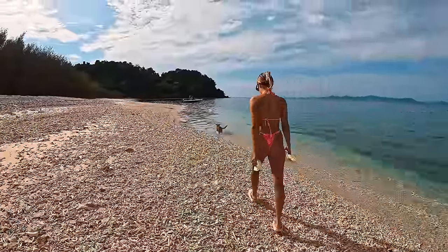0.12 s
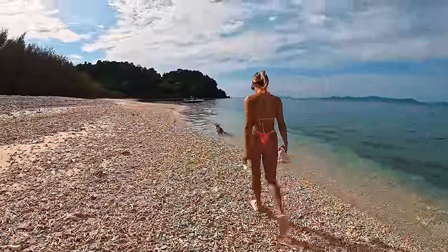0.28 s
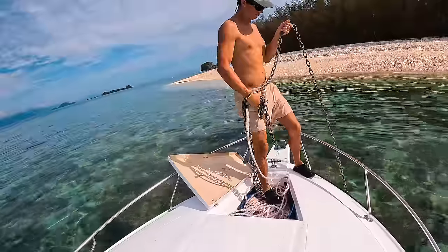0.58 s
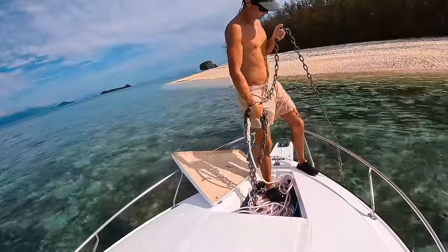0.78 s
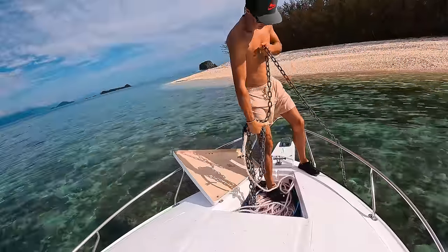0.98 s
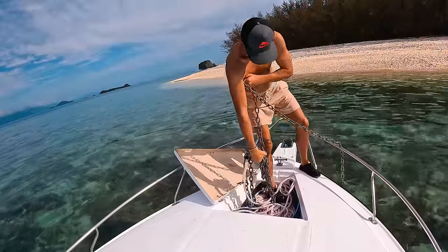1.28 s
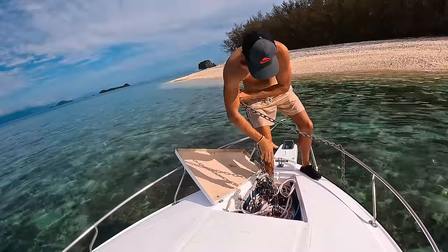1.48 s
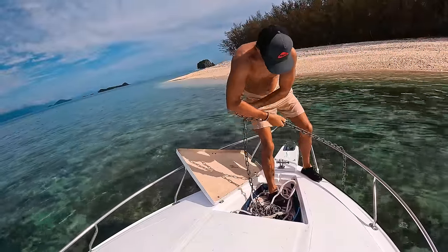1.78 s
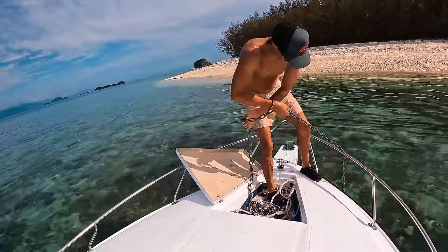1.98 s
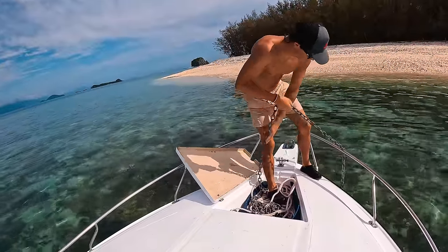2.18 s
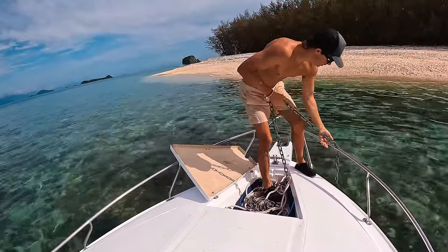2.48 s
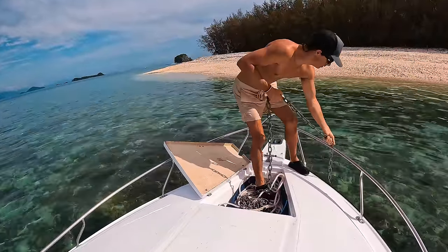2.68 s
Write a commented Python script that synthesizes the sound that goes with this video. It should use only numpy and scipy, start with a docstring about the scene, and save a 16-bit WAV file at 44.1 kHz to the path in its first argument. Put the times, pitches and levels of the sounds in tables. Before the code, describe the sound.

After soft crunching steps on a pebble beach and a tiny gap, chain links jingle close to the microphone, build to a dense bright pour, thump the hollow hull and thin out, over faint water and low wind rumble.

```python
"""Quiet steps crunch on beach gravel under wind; after a short silence a steel chain is hauled over a boat's bow.
Its links clink with a very high ring, a handful pours into the anchor well, and single links clink again.
Links are sums of decaying modes set off by timed or random contacts; deck and hull are modes struck by blows.
Gravel is bursts of tiny clicks; wind, water and the wind on the microphone are filtered noise."""
import sys
import numpy as np
from scipy import signal
from scipy.fft import rfft, irfft, next_fast_len
from scipy.io import wavfile
from scipy.ndimage import uniform_filter1d

SR = 44100
rng = np.random.default_rng(int(sys.argv[2]) if len(sys.argv) > 2 else 0)


def persist_wave(psi):
    """Save psi, clipped to +-1, as 16-bit WAV."""
    counts = np.round(np.clip(psi, -1, 1) * 32767).astype(np.int16)
    wavfile.write(sys.argv[1], SR, np.atleast_2d(counts).T)


N = 125685

# Single link contacts. Each row: start in seconds, relative level in dB, contact tick against the ring in dB.
CLINKS = [(0.6384, -40.5, 0.5), (0.715, -35.5, -2), (0.921, -25.5, -12), (0.9668, -23, -13),
          (0.9978, -16.5, -17), (1.065, -22.5, -15.5), (1.118, -23.5, -11), (1.1364, -15, -15),
          (1.143, -13, -24), (1.1653, -16.5, -15), (1.1968, -23, -9), (1.2755, -12, -17), (1.315, -24, -18),
          (1.389, -15.5, -19), (1.4345, -13.5, -14), (1.46, -10, -19), (1.4814, -3, -21),
          (1.515, -6.5, -20), (1.546, -7, -17), (1.605, -7.5, -13.5), (1.625, -19, -4),
          (1.7434, -22.5, -16.5), (1.8492, -44.5, 12), (1.9584, -18, -33), (2.0761, -22.5, -16),
          (2.1955, -35, -10), (2.233, -27, -34), (2.2773, -22.5, -20), (2.3317, -19, -19),
          (2.371, -18.5, -17), (2.4243, -25, -19), (2.5037, -28.5, -14.5), (2.5638, -31, -13),
          (2.572, -27.5, -9.5), (2.6044, -28.5, -29), (2.7978, -40.5, -7)]
# Ring of a steel link. Each row: frequency in Hz, relative level in dB, free ring time t60 in seconds.
LINK_MODES = [(11430, -12, .09), (11595, -3, .15), (11700, 0, .22), (11805, -7, .11), (12050, -12, .07),
              (12185, -6, .1), (12250, -2, .16), (12380, -10, .07), (12530, -7, .15)]
# Colour of a contact tick. Each row: frequency in Hz, relative level in dB.
TICK_COLOUR = [(300, -34), (1800, -13.5), (3500, -1.5), (9000, 8.5), (11000, 13), (13000, 4), (16000, -21)]
# Jingle of chain swaying in the hands, in two passages. Each row: time in seconds, relative level in dB.
SWAY_LEVELS = [
    [(0.86, -43.5), (0.94, -40), (1.04, -38.5), (1.11, -26), (1.17, -19), (1.25, -27), (1.3, -26),
     (1.37, -43)],
    [(2.17, -56.5), (2.25, -28), (2.31, -73), (2.45, -42), (2.54, -53.5), (2.62, -42), (2.67, -72)],
]
# Jingle of chain running into the well, in two passages. Each row: time in seconds, relative level in dB.
POUR_LEVELS = [
    [(1.375, -27.5), (1.425, -21.5), (1.485, -12.5), (1.54, -11.5), (1.615, -8.5), (1.66, -15.5),
     (1.70, -30.5), (1.77, -32.5), (1.83, -74)],
    [(1.93, -31.5), (1.965, -25.5), (2.02, -34), (2.05, -25), (2.1, -38), (2.125, -74)],
]
# Chain knocking on the deck. Each row: start in seconds, relative level in dB, tilt of the ring in dB per octave.
KNOCKS = [(1.8516, -32.5, 4), (1.857, -33.5, 1), (1.9478, -14.5, 6.5), (1.967, -26.5, -4.5),
          (1.9775, -24, -5), (1.989, -34, -5), (2.037, -20, -1.5), (2.0935, -21.5, 1.5), (2.643, -45.5, -6),
          (2.716, -46.5, -14), (2.728, -42.5, -11)]
# Ring of the deck. Each row: frequency in Hz, relative level in dB, t60 in seconds.
DECK_MODES = [(860, -1, 0.015), (1280, -1, 0.041), (1514, 1.5, 0.037), (1716, 2.5, 0.028),
              (1924, -2, 0.013), (2542, 4, 0.015), (3407, 7, 0.013), (4180, -7, 0.024), (4580, -11, .014),
              (5730, -10, .012)]
# Colour of a knock's crack. Each row: frequency in Hz, relative level in dB.
CRACK_COLOUR = [(200, -14.5), (900, 4), (1100, -1), (1550, 6), (3500, -2.5), (7200, -15), (16000, -35)]
# Links rattling over the deck between knocks. Each row: time in seconds, level in dB.
DRAG_LEVEL = [(1.93, -53), (1.97, -41), (2.01, -43), (2.085, -58)]
# Loops of chain thumping the hull. Each row: start in seconds, level in dB, tilt of the ring in dB per octave.
THUMPS = [(1.599, -30.5, -10), (1.6285, -31, -2.5), (1.857, -34.5, -6), (1.9505, -26, 1), (2.021, -36.5, 3),
          (2.039, -30, -3), (2.0935, -34.5, 1), (2.727, -36, 0.5)]
# Ring of the hull. Each row: frequency in Hz, relative level in dB, t60 in seconds.
HULL_MODES = [(68, -20, .1), (131, -3.5, 0.2), (207, 0, 0.056), (294.3, -5, 0.11), (510, -5.5, .04)]
# Groan as the chain drags over the bow. Each row: time in seconds, pitch in Hz, level in dB.
GROAN = [(1.991, 410, -53), (2.012, 385, -38), (2.066, 306, -38.5), (2.09, 292, -69)]
# The hull's boom under the moving chain. Each row: time in seconds, level in dB.
BOOM_LEVEL = [(1.1, -50), (1.42, -54.5), (1.49, -43), (1.57, -45), (1.62, -31.5), (1.69, -56),
              (1.83, -41.5), (2.0, -38), (2.2, -55), (2.6, -55.5), (2.73, -43), (2.84, -50)]
# Colour of that boom. Each row: frequency in Hz, relative level in dB.
BOOM_COLOUR = [(40, -2), (62, 5), (90, 0.5), (132, 6.5), (250, -3), (500, -9), (2000, -35)]
# Crunches of gravel underfoot. Each row: centre in seconds, level in dB, spread of the swell in seconds.
STEPS = [(0.046, -47.5, 0.031), (0.12, -42.5, 0.012), (0.192, -42.5, 0.022), (0.278, -50, 0.07),
         (0.453, -52, 0.092)]
# Colour of the gravel. Each row: frequency in Hz, relative level in dB.
GRAVEL_COLOUR = [(300, 3), (900, 3.5), (2000, -3), (4000, -4.5), (8000, -1), (12000, -3), (16000, -9)]
# Single pebbles chinking. Each row: start in seconds, frequency in Hz, level in dB.
PEBBLES = [(0.055, 14900, -31), (0.249, 7040, -38.5), (0.308, 7100, -39)]
# Wind and lapping water at the beach. Each row: frequency in Hz, relative density in dB per Hz.
BEACH_AIR = [(35, -2.5), (80, -14), (438, -17), (1490, -17.5), (6230, -32.5), (8620, -32.5), (15000, -50)]
# Level of the wind and water at the beach. Each row: time in seconds, level in dB.
BEACH_LEVEL = [(0, -46), (.2, -46.5), (.36, -48), (.49, -51.5), (.512, -38)]
# Wind and lapping water round the boat. Each row: frequency in Hz, relative density in dB per Hz.
BOAT_AIR = [(60, -0.5), (140, 2.5), (300, -4.5), (800, -3), (1600, -5), (3500, -11.5), (7000, -18),
            (10000, -20), (15000, -49)]
# Level of the wind and water round the boat, with a short scuff at 0.65 s.
# Each row: time in seconds, level in dB.
BOAT_LEVEL = [(.6, -56), (.632, -54), (.648, -38.5), (.69, -47), (.9, -50), (1.3, -54.5), (1.8, -52),
              (2.35, -50.5), (2.85, -55)]
# The silence between beach and boat: start and end in seconds.
SILENCE_S = (.519, 0.6014)
# Wind on the microphone. Each row: frequency in Hz, relative level in dB.
BUFFET_COLOUR = [(4, 3.5), (18, -8), (32, -34), (120, -81.5)]
# Hiss of the water. Each row: frequency in Hz, relative level in dB.
WASH_COLOUR = [(500, -10), (2500, 6.5), (7000, -6), (15000, -14)]

# links: mean rebound delay, and its level against the first hit
REBOUND_S, REBOUND_DB = 0.0028, -5.5
TICK_S, TICK_DB = 0.0029, -0.5
CLINK_DB, CLINK_RISE_S = -2, 0.0013  # a ring builds up as the links press together
CLINK_RING, JINGLE_RING = 0.42, 0.88  # share of the free ring time
LINK_SPREAD, MODE_SCATTER_DB = .004, 6  # scale of the random detuning and of the random mode levels
SWAY_DB, SWAY_PER_S, SWAY_TICK_DB = -3.5, 220, -18
POUR_DB, POUR_PER_S, POUR_TICK_DB = -4, 800, -18
CONTACT_SCATTER_DB = -0.5
SCRAPE_DB = -25  # links sliding over each other, against their ring
# deck: the first sharp push and the longer tail are set against the crack
CONTACT_DB, CRACK_S = -1, 0.0033
DECK_DB, DECK_TAIL_S, DECK_TAIL_DB = -7.5, 0.012, -15.5
DRAG_PER_S = 900
# beach and water
GRAINS_PER_S, GRAIN_SCATTER_DB, PEBBLE_T60_S = 3000, 4, 0.053
WASH_DB, WASH_FADE_DB_PER_S = -50.5, 18
# microphone and recorder
BEACH_BUFFET_DB, BOAT_BUFFET_DB, FADE_IN_S = -25.5, -27, 0.092
# faint stereo width: a delayed copy of all but the links, opposite in left and right
SIDE_DB, SIDE_LAG_S = -33.5, .004
TOP_HZ = 15750
OFFSET, OFFSET_RISE_S, OFFSET_SETTLE_S = -0.29, 0.052, 1


def clinks():
    """One link hits the next and rebounds: two ticks, and a ring with its own mix of the modes."""
    hz, db, t60 = np.array(LINK_MODES).T[:, :, None]
    t = np.arange(SR // 4) / SR
    rise = 1 - np.exp(-t / CLINK_RISE_S)
    decay = undb(-60 * t / (t60 * CLINK_RING))
    out, ticks = np.zeros(N + SR), np.zeros(N + SR)
    for start, level_db, tick_db in CLINKS:
        rebound = start + REBOUND_S * (.5 + rng.random())
        contact_pair = (start, undb(level_db)), (rebound, undb(level_db + REBOUND_DB))
        for when, size in contact_pair:
            detune, mix, phase = rng.uniform(-1.23, 1, (3, len(hz), 1))
            weight = undb(db + MODE_SCATTER_DB * mix)
            link_hz = hz * (1 + LINK_SPREAD * detune)
            modes = weight * decay * np.sin(2 * np.pi * link_hz * t + np.pi * phase)
            i = int(when * SR)
            out[i:i + len(t)] += size * rise * modes.sum(0) / np.linalg.norm(weight)
            ticks[i] += size * undb(tick_db)
    tick_noise = colour(burst(ticks[:N], TICK_S), TICK_COLOUR)
    return undb(CLINK_DB) * out[:N] + undb(TICK_DB) * tick_noise


def jingle(levels, per_s, tick_db, count=6):
    """Several slightly different links jostle at random, each contact ringing and ticking, and scrape as noise."""
    force = sum(curve(rows) for rows in levels)
    rings, ticks, ring_power = 0, 0, 0
    for _ in range(count):
        hits = unit(contacts(per_s / count, CONTACT_SCATTER_DB)) * force
        ticks = ticks + hits
        for hz, db, free_t60 in LINK_MODES:
            t60 = free_t60 * JINGLE_RING
            link_hz = hz * (1 + LINK_SPREAD * rng.uniform(-1.1, 1))
            rings = rings + undb(db) * ring(hits * rng.standard_normal(N), link_hz, t60)
            # energy of one decaying sine, to level the sum
            ring_power += undb(db) ** 2 * t60 * SR / (4 * np.log(1000))
    tick_noise = colour(burst(ticks, TICK_S), TICK_COLOUR) / np.sqrt(count * TICK_S * SR / 2)
    scrape = undb(SCRAPE_DB) * force * noise(TICK_COLOUR)
    return rings / np.sqrt(ring_power) + undb(tick_db) * tick_noise + scrape


def deck():
    """Hard knocks crack and ring the deck briefly; between them the dragged links rattle on its modes."""
    s, db, _ = np.array(KNOCKS).T
    hits = strikes(s, undb(db))
    tail = undb(DECK_TAIL_DB) * burst(hits, DECK_TAIL_S)
    crack = colour(undb(CONTACT_DB) * hits + burst(hits, CRACK_S) + tail, CRACK_COLOUR)
    taps = contacts(DRAG_PER_S, scatter_db=-2.5) * rng.standard_normal(N)
    rattle = unit(sum(undb(mode_db) * ring(taps, hz, t60) for hz, mode_db, t60 in DECK_MODES))
    return crack + undb(DECK_DB) * struck(KNOCKS, DECK_MODES) + rattle * curve(DRAG_LEVEL)


def hull():
    """Loops of chain ring the hollow hull, lighter links drum on it, and the drag draws a falling sine groan."""
    blows = contacts(per_s=530, scatter_db=0.5) * np.sign(rng.standard_normal(N))
    boom = unit(colour(blows, BOOM_COLOUR)) * curve(BOOM_LEVEL)
    s, hz, db = np.array(GROAN).T
    groan_phase = 2 * np.pi * np.cumsum(np.interp(clock(), s, hz)) / SR
    groan = np.sin(groan_phase) * curve(np.c_[s, db])
    return struck(THUMPS, HULL_MODES) + boom + groan


def gravel():
    """Each step sets off a swell of tiny stone clicks; a few pebbles ring as single modes."""
    force = sum(undb(db) * np.exp(-.5 * ((clock() - s) / spread) ** 2) for s, db, spread in STEPS)
    clicks = burst(contacts(GRAINS_PER_S, GRAIN_SCATTER_DB), decay_s=0.00076)
    grains = unit(colour(clicks, GRAVEL_COLOUR))
    pebbles = sum(ring(strikes([s], [undb(db)]), hz, PEBBLE_T60_S) for s, hz, db in PEBBLES)
    return force * grains + pebbles


def water():
    """Wind and lapping water round the boat, and a short scuff, as shaped noise; the hiss of a wash dies away."""
    wash_level = undb(WASH_DB - WASH_FADE_DB_PER_S * clock(SILENCE_S[1]))
    return noise(BOAT_AIR) * curve(BOAT_LEVEL) + noise(WASH_COLOUR) * wash_level


def beach_air():
    """Wind and lapping water at the beach as shaped noise."""
    return noise(BEACH_AIR) * curve(BEACH_LEVEL)


def buffet(db):
    """Wind on the microphone: very low noise."""
    return undb(db) * noise(BUFFET_COLOUR)


def struck(blows, modes):
    """Ring a body's modes with blows; each blow's tilt favours the upper or the lower modes."""
    s, db, tilt = np.array(blows).T
    centre = np.mean(np.log2(np.array(modes)[:, 0]))
    out = 0
    for k, (hz, mode_db, t60) in enumerate(modes):
        sizes = undb(db + mode_db + tilt * (np.log2(hz) - centre))
        out = out + (-1) ** k * ring(strikes(s, sizes), hz, t60)
    return out


def ring(hits, hz, t60):
    """One decaying mode: a two-pole resonator that falls 60 dB in t60 seconds."""
    r, w = undb(-60 / (t60 * SR)), 2 * np.pi * hz / SR
    return signal.lfilter([r * np.sin(w)], [1, -2 * r * np.cos(w), r * r], hits + 1e-18)


def burst(hits, decay_s):
    """A puff of noise that dies away after each impulse."""
    power = signal.lfilter([1], [1, -np.exp(-2 / (decay_s * SR))], hits ** 2)
    return np.sqrt(power + 1e-18) * rng.standard_normal(N)


def contacts(per_s, scatter_db):
    """Random impulses of uneven strength."""
    return (rng.random(N) < per_s / SR) * undb(scatter_db * rng.standard_normal(N))


def strikes(times, sizes):
    """An impulse at each time."""
    return np.bincount(np.clip(np.asarray(times) * SR, 0, N - 1).astype(int), sizes, N)


def noise(points):
    """Coloured noise of rms 1."""
    return unit(colour(rng.standard_normal(N), points))


def colour(x, points):
    """Causal (minimum-phase) filter through (Hz, dB) points that keeps the power of white noise."""
    hz, db = np.array(points).T
    size = 2 * next_fast_len(N)
    bins_hz = np.arange(size // 2 + 1) * SR / size + 1e-3
    gain = unit(undb(np.interp(np.log(bins_hz), np.log(hz), db)))
    # folding the cepstrum makes the filter causal
    cepstrum = irfft(np.log(gain))
    cepstrum[1:size // 2] *= 2
    cepstrum[size // 2 + 1:] = 0
    return irfft(rfft(x, size) * np.exp(rfft(cepstrum)))[:N]


def curve(rows):
    """Gain along (seconds, dB) points, at -120 dB outside them."""
    s, db = np.array(rows).T
    return undb(np.interp(clock(), s, db, left=-120, right=-120))


def clock(start=0):
    """Seconds since a start, zero before it."""
    return np.maximum(np.arange(N) / SR - start, 0)


def unit(x):
    """Scale to rms 1."""
    return x / np.sqrt(np.mean(x ** 2) + 1e-18)


def undb(db):
    """Decibels to gain."""
    return 10 ** (np.asarray(db) / 20)


def scene():
    """First the beach, then the boat, whose wind buffet fades in; nearly everything sits in the middle."""
    t = clock()
    sway = undb(SWAY_DB) * jingle(SWAY_LEVELS, SWAY_PER_S, SWAY_TICK_DB)
    pour = undb(POUR_DB) * jingle(POUR_LEVELS, POUR_PER_S, POUR_TICK_DB)
    chain = clinks() + sway + pour
    swell = 1 - np.exp(-(clock(SILENCE_S[1]) / FADE_IN_S) ** 2)
    boat = deck() + hull() + water() + swell * buffet(BOAT_BUFFET_DB)
    beach = gravel() + beach_air() + buffet(BEACH_BUFFET_DB)
    # both places are mute during the silence, with edges smoothed over 256 samples
    on_beach = uniform_filter1d(1. * (t < SILENCE_S[0]), size=256)
    on_boat = uniform_filter1d(1. * (t > SILENCE_S[1]), size=256)
    around = beach * on_beach + boat * on_boat
    side = undb(SIDE_DB) * np.interp(t - SIDE_LAG_S, t, around)
    return chain + around + side * np.array([[1], [-1]])


def record(dry):
    """After the silence the signal sits off centre and slowly settles; the recorder cuts the top steeply."""
    t = clock(SILENCE_S[1])
    offset = OFFSET * (1 - np.exp(-(t / OFFSET_RISE_S) ** 2)) * np.exp(-t / OFFSET_SETTLE_S)
    top_cut = signal.ellip(10, .2, 80, TOP_HZ, fs=SR, output="sos")  # 0.2 dB ripple, 80 dB stop
    return signal.sosfilt(top_cut, dry + offset)


dry = scene()
out = record(dry)
persist_wave(out)
```